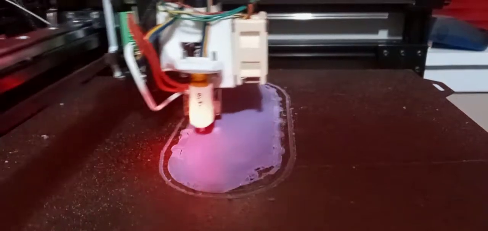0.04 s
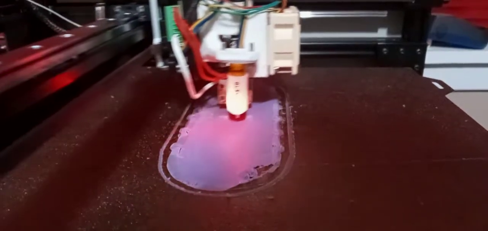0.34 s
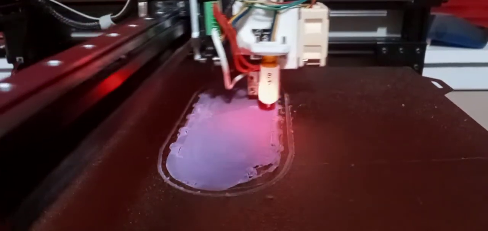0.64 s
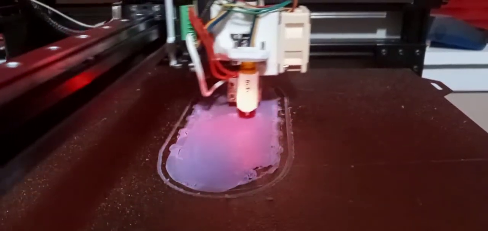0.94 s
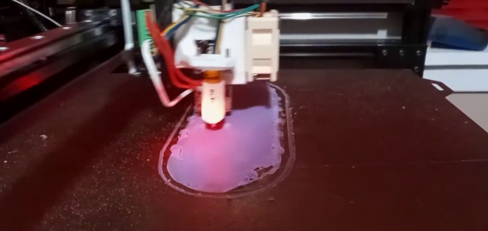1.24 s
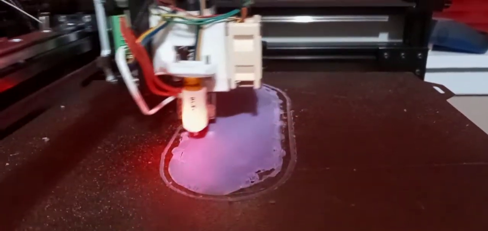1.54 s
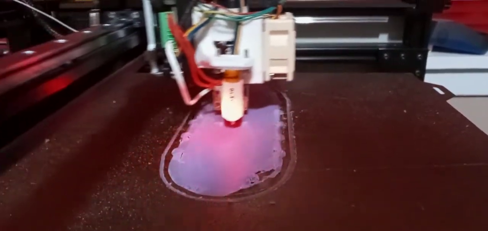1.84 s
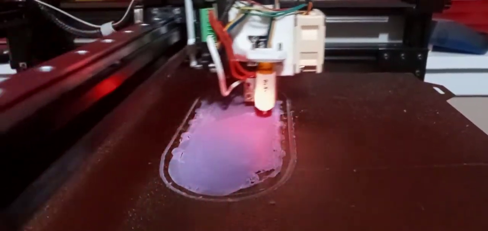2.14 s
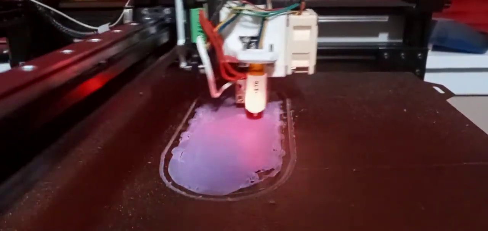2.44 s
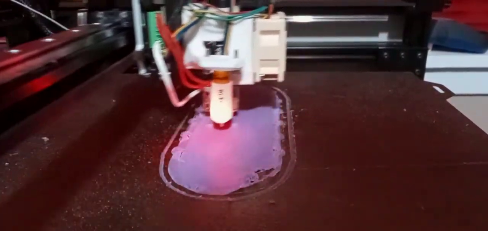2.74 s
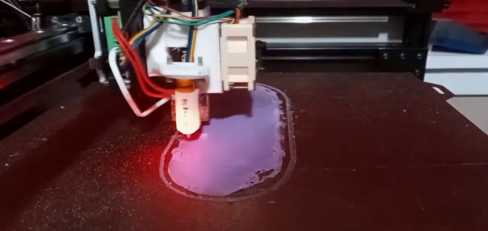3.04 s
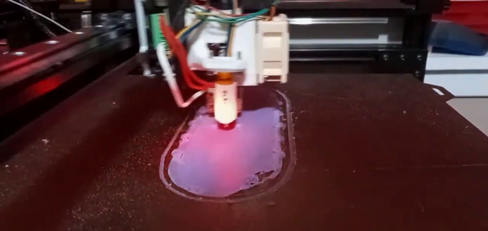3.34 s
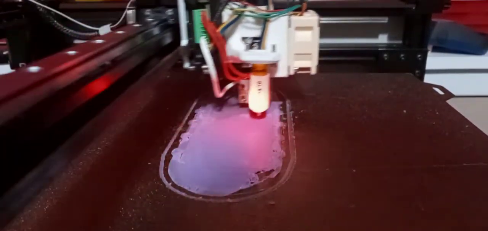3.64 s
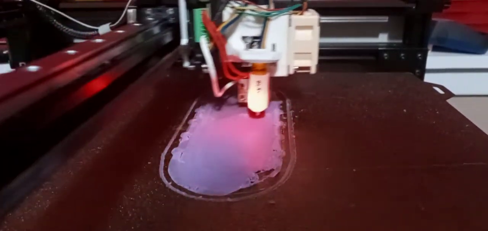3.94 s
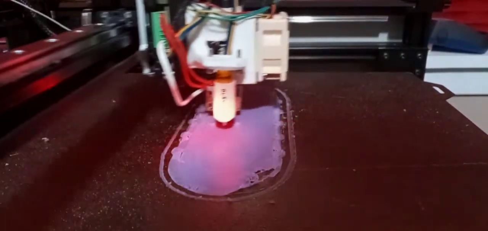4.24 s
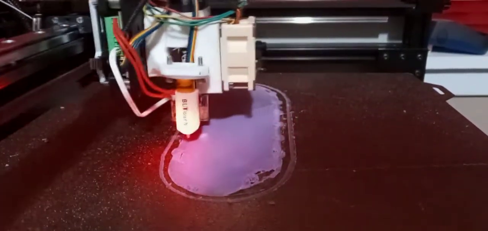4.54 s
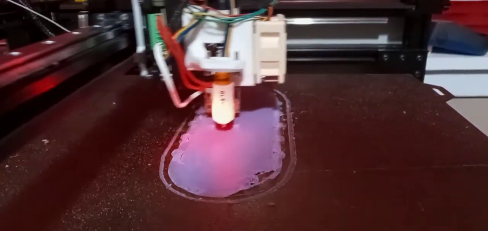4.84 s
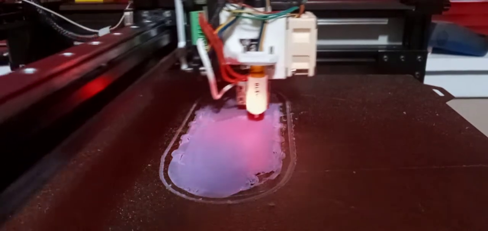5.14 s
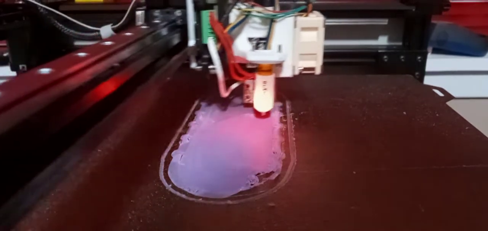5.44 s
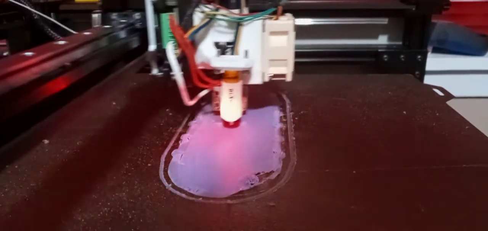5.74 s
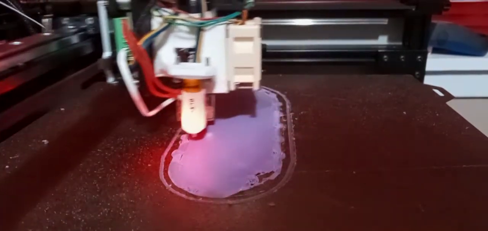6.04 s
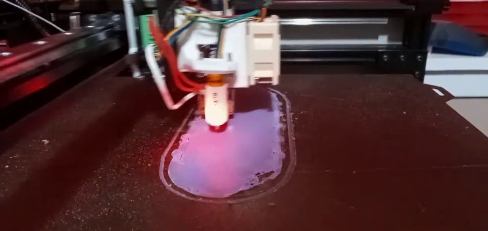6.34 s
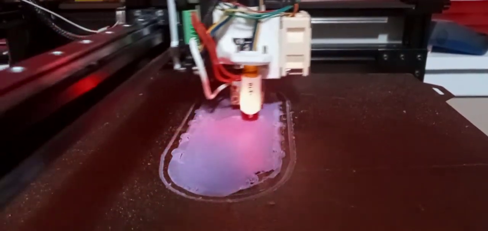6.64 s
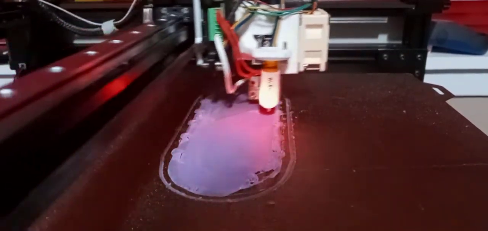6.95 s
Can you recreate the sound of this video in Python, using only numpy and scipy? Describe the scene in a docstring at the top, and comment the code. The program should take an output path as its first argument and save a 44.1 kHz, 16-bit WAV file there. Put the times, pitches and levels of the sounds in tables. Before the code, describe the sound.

A 3D printer's motors hum and whine as its head shuttles back and forth, knocking at every turn over rushing fans.

```python
"""Stepper motors hum and whine as the head of a nearby 3D printer shuttles to and fro, filling a layer.
Every motor step tugs the frame, and the fast, even tugs make the tones. At each turn the motors brake
and start again; both jolts boom in the frame and rattle the carriage that carries the head.
The motor coils sizzle and a thin whistle comes and goes. Behind them the rails hiss,
small ticks sound as the head travels, and cooling fans rush."""
import sys
import numpy as np
from scipy import signal
from scipy.fft import rfft, irfft, next_fast_len
from scipy.io import wavfile
from scipy.ndimage import uniform_filter1d, map_coordinates

SR = 44100
rng = np.random.default_rng(int(sys.argv[2]) if len(sys.argv) > 2 else 0)


def wrap_up_sound(samples):
    """Save the sound to the file named by the first command line argument, as 16-bit audio."""
    columns = np.atleast_2d(samples).T
    # keep every value between -1 and 1, then stretch to whole-number steps
    tamed = np.clip(columns, -1, 1)
    steps = np.round(tamed * 32767).astype(np.int16)
    wavfile.write(sys.argv[1], SR, steps)


N = 312795

STEP_HZ = 346.5  # motor steps per second at full speed
HUM, WHINE, HIGH_WHINE = 1, 6, 12  # multiples of the step rate
# The motor tones on a stroke (one trip of the head) to the right. Each row: multiple of the step rate,
# level in dB, rise over the stroke in dB, dip at mid-stroke in dB, depth of the beat (a slow pulsing)
# from 0 to 1, first peak of the beat as a share of the stroke.
RIGHTWARD_TONES = [(1, -42, 5.5, -1.2, .05, 0.22), (2, -52.5, 2.5, 4.5, 0.23, 0.049),
                   (3, -55.5, -2, 0.5, 0.1, 0.15), (4, -52, 0.3, 0.5, 0.42, .32),
                   (5, -65.5, 8.5, 0, .3, 0.25), (6, -44.5, 2, 0.5, 0.36, 0.32), (7, -68, 4, -5, 0.9, 0.18),
                   (8, -75, 2, 2.5, 1, .14), (10, -73, -14.5, 0, .35, 0.083),
                   (11, -80, -13, -1.5, 0.5, .08), (12, -62, 1.5, 4, 0.07, 0.16),
                   (16, -68.5, -0.5, -1, 0.05, 0.07), (18, -76.5, -3, 0, 0.1, 0.12)]
# The motor tones on a stroke to the left, with the same columns.
LEFTWARD_TONES = [(1, -40.5, -2, -1, .06, 0.25), (2, -55, -2, -1, 0.14, .3), (3, -61, -3, -0.5, 0.31, .05),
                  (4, -51.5, -1.5, 0, 0.18, 0.31), (5, -62, -8.5, -2, .3, .3),
                  (6, -40.5, .5, 0.5, 0.23, .21), (7, -71.5, -12, -0.5, 1, 0.33),
                  (8, -70, -1.5, 2.5, 0.95, 0.23), (10, -77, 16, 3.5, 0.65, 0.042),
                  (11, -74.5, 12, -1, 0.2, 0.25), (12, -63, -5, 7, 0.15, 0.34),
                  (16, -73, 3.5, 0.5, 0.22, 0.11), (18, -79, 6, -1.5, 0.1, 0.17)]


def steppers(step_phase, progress, leftward):
    """Every step tugs the frame; the hum and its overtones swell alike on all strokes of one direction."""
    tones = np.zeros(N)
    places = np.linspace(0, 1, 100)
    for right_row, left_row in zip(RIGHTWARD_TONES, LEFTWARD_TONES):
        multiple = round(right_row[0])
        left_level = np.interp(progress, places, stroke_level(left_row, places))
        right_level = np.interp(progress, places, stroke_level(right_row, places))
        level = np.where(leftward, left_level, right_level)
        if multiple == HIGH_WHINE:
            level = level * amp(drift_db())
        unsteady = .25 if multiple in (HUM, WHINE) else 1  # these two waver less than the rest
        flutter_db = unsteady * (1.2 * wobble(6) + wobble(35))
        tones += level * amp(flutter_db) * tone(multiple * step_phase + unsteady * .28 * wobble(30))
    return tones


def stroke_level(row, progress, beats_per_stroke=2.71):
    """One tone's strength along a stroke: a slope, a dip or hump midway, and a beat as the rotors turn."""
    _, db, rise_db, dip_db, depth, peak = row
    beat = np.abs(1 + depth * np.exp(2j * np.pi * beats_per_stroke * (progress - peak)))
    return amp(db + rise_db * (progress - .5) + dip_db * dip(progress)) * beat


# The turns of the head, left end first, then right and left in turn. Each row: braking time and starting
# time in seconds, braking boom and starting boom in dB, braking rattle and starting rattle in dB.
HEAD_TURNS = [(-.005, .025, -24.5, -25.5, -56.5, -48.5), (0.76, 0.804, -23.5, -22, -54.5, -53.5),
              (1.537, 1.578, -27.5, -24.5, -49, -48), (2.316, 2.354, -32, -21, -72, -48.5),
              (3.097, 3.138, -24, -25.5, -44.5, -49), (3.877, 3.917, -23.5, -22.5, -52, -55.5),
              (4.658, 4.694, -31.5, -22, -55, -44), (5.409, 5.449, -29, -21.5, -65, -47),
              (6.189, 6.226, -27, -29.5, -43.5, -50), (6.967, 7.008, -24.5, -31, -52, -66.5)]
# The frame's low notes. Each row: pitch in Hz, dB added to the boom, seconds to swell, seconds to
# fade by 60 dB.
FRAME_NOTES = [(240, -9.5, 0.010, 0.08), (258.6, -14, 0.025, 0.15)]
# The colour of the rattle (how strong its lows and highs are). Each row: frequency in Hz, relative dB.
RATTLE_COLOUR = [(100, -39), (2500, -10), (4400, -12), (6000, -16), (8400, -17), (9100, -16), (9800, -38),
                 (10700, -13.5), (11450, 6.5), (12200, -10.5), (13400, -2), (15700, -8)]


def jolts():
    """Each jolt makes the frame boom; loose carriage parts buzz at the pace of its lowest note."""
    boom, buzz = np.zeros(N), np.zeros(N)
    turns = np.array(HEAD_TURNS)
    braking, starting = turns[:, 0::2], turns[:, 1::2]
    for start, boom_db, rattle_db in np.vstack([braking, starting]):
        span = slice(max(0, int(start * SR)), int(start * SR) + SR // 3)
        t = np.maximum(clock()[span] - start, 0)
        for hz, db, rise_s, fade_s in FRAME_NOTES:
            swell = np.sin(np.pi / 2 * np.minimum(t / rise_s, 1)) ** 2
            # the motor lets go gradually, so the fade begins gently
            fading_for_s = np.hypot(np.maximum(t - rise_s, 0), .016) - .016
            fade = amp(-60 * fading_for_s / fade_s)
            detuned_hz = hz * (1 + .016 * rng.normal())
            swing = np.sqrt(2) * np.sin(2 * np.pi * detuned_hz * t)
            boom[span] += amp(boom_db + db) * swell * fade * swing
        contact = np.minimum(t / .0033, 1) * amp(-60 * np.maximum(t - .02, 0) / .072)
        chatter = 1 + .45 * np.cos(2 * np.pi * FRAME_NOTES[0][0] * t)
        buzz[span] += amp(rattle_db) * contact * chatter
    return boom + buzz * patchy(noise(RATTLE_COLOUR), depth_db=1.2)


# The notes of two panels. Each row: delay after braking in seconds, pitch in Hz, level at the left end
# in dB, level at the right end in dB.
PANEL_NOTES = [(.018, 826.5, -48, -42.5), (0.045, 541, -54, -47)]


def panels():
    """Two panels ring briefly in each turn, set off by the changing step rate."""
    rings = np.zeros(N)
    for delay, hz, left_db, right_db in PANEL_NOTES:
        level = sum(amp(right_db if i % 2 else left_db) * bump(turn[0] + delay, width_s=.011)
                    for i, turn in enumerate(HEAD_TURNS))
        rings += level * tone(2 * np.pi * hz * clock() + .5 * wobble(60))
    return rings


# The colour of the coils' sizzle. Each row: frequency in Hz, relative level in dB.
SIZZLE_COLOUR = [(2700, -26), (4400, -15), (5200, -29), (7100, -21), (7900, -38), (11500, -40),
                 (12400, -21), (14200, -16), (14550, 0), (14800, -1), (15100, -11), (15700, -17)]


def sizzle(step_phase):
    """The coil current kicks once every two steps, making a row of evenly spaced high tones."""
    tones = np.zeros(N)
    for multiple in range(15, 91):
        level_db = along(SIZZLE_COLOUR, multiple * STEP_HZ / 2) + 2.5 * wobble(22)
        tones += amp(level_db) * np.cos(multiple * step_phase / 2 + 1.4 * rng.normal())
    return unit(tones)


# The colour of the coils' hiss. Each row: frequency in Hz, relative level in dB.
HISS_COLOUR = [(9800, -32), (11500, -14), (12200, -4), (14100, -3), (14700, 8), (15200, 0), (15700, -1)]


def coils(step_phase, running, leftward_progress):
    """The coils sizzle and give off a pulsing hiss; both die down as the head runs to the left."""
    hiss = unit(noise(HISS_COLOUR) * (1 + .35 * np.cos(step_phase / 2)))
    sizzle_db = -58 + 2 * wobble(25) - 4.5 * leftward_progress
    sizzling = amp(sizzle_db) * sizzle(step_phase)
    thin_tone = amp(-76.5 + 1.5 * wobble(12)) * tone(37 * step_phase)  # stands out of the sizzle
    hiss_db = -64.5 - 12 * leftward_progress + 2 * wobble(20)
    return running * (sizzling + thin_tone) + amp(hiss_db) * hiss


# The thin whistles. Each row: start in seconds, end in seconds, level in dB.
WHISTLE_SPELLS = [(.095, .458, -57), (1.658, 2.016, -61.5), (2.408, 2.628, -62), (3.2, 3.574, -60.5),
                  (6.283, 6.66, -62.5), (7.066, 7.2, -58)]


def whistle(hz=11963):
    """The circuit that drives a motor sings at one high pitch during some strokes."""
    level = sum(amp(db) * gate(start, end, edge_s=.012) for start, end, db in WHISTLE_SPELLS)
    return level * amp(.8 * wobble(4.5)) * tone(2 * np.pi * hz * clock())


ROUGH_SPOT, ROUGH_SPOT_DB = .768, -43.5  # share of the way along each stroke to the right, and level
WHINE_BRAKING_DB, WHINE_STARTING_DB = -45, -44  # the rasp of the motor whine at the left end
# The colour of the rolling on the rails. Each row: frequency in Hz, relative level in dB.
RAIL_COLOUR = [(2000, -14), (3000, -2.5), (3600, -1.5), (4250, 9), (4800, 2.5), (5050, -14.5), (5450, 1.5),
               (6650, -21.5), (7200, 3), (7600, -35.5), (9200, -18), (9800, -43), (12000, -21.5)]


def rails_and_rasps(progress, leftward):
    """The rails hiss and rasp at one rough spot; at the left end the motor whine turns to a brief rasp."""
    rolling_db = -65.5 + 3.5 * dip(progress) - 2 * progress * leftward + drift_db()
    grit_db = .83 * wobble(4.1) + 2.3 * wobble(120)
    rolling = amp(rolling_db + grit_db) * patchy(noise(RAIL_COLOUR), depth_db=1.5)
    ends = stroke_ends()
    rasps = [(left + ROUGH_SPOT * (right - left), ROUGH_SPOT_DB)
             for left, right in zip(ends[0::2], ends[1::2])]
    for braking, starting, *_ in HEAD_TURNS[0::2]:
        rasps += [(braking, WHINE_BRAKING_DB), (starting, WHINE_STARTING_DB)]
    rasp = noise([(1100, -25.5), (1550, -4.0), (1950, 1.5), (2500, -22.0), (3500, -44.5)])
    return rolling + rasp * sum(amp(db) * bump(when, width_s=.021) for when, db in rasps)


# The clear ticks. Each row: start in seconds, level in dB.
CLEAR_TICKS = [(.616, -55), (2.166, -56), (2.254, -56.5), (3.648, -61), (3.809, -57), (5.108, -54.5),
               (5.27, -55), (6.893, -54)]
# The colour of a tick. Each row: frequency in Hz, relative level in dB.
TICK_NOISE_COLOUR = [(2000, -32.5), (4200, -3), (5500, 0), (7000, 6), (7900, -13.5), (9000, -16),
                     (9900, -23), (11400, -14), (15000, -26.5)]


def ticks(faint_count=170, fade_s=.026):
    """Small ticks as the head travels: a few clear ones, some at the rough spot, among many faint ones."""
    faint_ticks = rng.uniform([0, -76], [N / SR, -64.5], (faint_count, 2))  # random times and levels
    kicks = np.zeros(N)
    for start, db in np.vstack([CLEAR_TICKS, faint_ticks]):
        kicks[min(int(start * SR), N - 1)] += amp(db)
    fade = amp(-60 * np.arange(SR // 20) / SR / fade_s)
    return signal.fftconvolve(kicks, fade)[:N] * noise(TICK_NOISE_COLOUR)


# The colour of the air from the fans. Each row: frequency in Hz, relative level in dB.
AIR_COLOUR = [(30, -46), (90, -37.5), (130, -18), (170, -10), (255, 1.5), (310, 0.5), (430, -1.5),
              (500, -10), (630, -2.5), (780, -2), (950, 4.5), (1130, -6), (1480, -4), (1640, 4),
              (2050, -3.5), (2500, -11.5), (3000, -25.5), (5000, -49)]
# The tones of the fan blades. Each row: pitch in Hz, level in dB.
BLADE_TONES = [(139, -80), (255, -73), (978, -64.5)]


def fans():
    """The fans push rushing air, and their blades add a few unsteady tones."""
    swirl_db = .4 * wobble(5) + .8 * wobble(30)
    air = amp(-45.5 + swirl_db) * patchy(noise(AIR_COLOUR), depth_db=2.5)
    blades = sum(amp(db + wobble(10)) * tone(2 * np.pi * hz * clock() + 1.1 * wobble(8.3))
                 for hz, db in BLADE_TONES)
    return air + blades


def head_motion(brake_lead_s=.011, speed_up_s=.015):
    """How deep the head is in a turn (0-1), how far along its stroke (0-1), and whether it runs left."""
    turning = sum(gate(braking - brake_lead_s, starting + speed_up_s, edge_s=.026)
                  for braking, starting, *_ in HEAD_TURNS)
    ends = stroke_ends()
    ends = np.append(ends, ends[-1] + np.diff(ends).mean())  # the last stroke is of average length
    stroke, progress = np.divmod(np.interp(clock(), ends, np.arange(len(ends))), 1)
    return np.minimum(turning, 1), progress, stroke % 2


def stroke_ends():
    """The moments at which the head stands still, halfway between braking and starting."""
    return np.array(HEAD_TURNS)[:, :2].mean(axis=1)


def drift_db(db_per_s=-.35):
    """The high whine and the rails slowly grow quieter as the layer fills."""
    return db_per_s * (clock() - clock().mean())


def dip(progress):
    """-1/2 at mid-stroke, +1/2 at both ends."""
    return .5 * np.cos(2 * np.pi * progress)


def amp(db):
    """Turn decibels into a number to multiply by."""
    return 10 ** (np.asarray(db) / 20)


def unit(x):
    """Scale x to an average strength (rms) of 1."""
    return x / np.sqrt(np.mean(x ** 2) + 1e-20)


def clock():
    """The time of every sample in seconds."""
    return np.arange(N) / SR


def along(colour, hz):
    """Read a colour's level in dB at any frequency, sliding between its rows."""
    row_hz, row_db = np.transpose(colour)
    return np.interp(np.log(hz + 1), np.log(row_hz), row_db)


def wobble(rate):
    """A smooth curve through `rate` random values a second."""
    coarse = np.arange(0, N + 64, 64)
    values = rng.standard_normal(2048)
    return np.interp(np.arange(N), coarse, map_coordinates(values, [coarse * rate / SR], mode="wrap"))


def filtered(x, gain_at):
    """Multiply each frequency in x by gain_at(hz)."""
    size = next_fast_len(N + SR // 2)
    return irfft(rfft(x, size) * gain_at(np.fft.rfftfreq(size, 1 / SR)), size)[:N]


def noise(colour):
    """Noise of the given colour and strength 1."""
    return unit(filtered(rng.standard_normal(N), lambda hz: amp(along(colour, hz))))


def patchy(x, depth_db):
    """Make x louder and softer in random patches of time and pitch; the result has strength 1."""
    spectra = signal.stft(x, nperseg=512)[2]
    patches = uniform_filter1d(rng.standard_normal(spectra.shape), size=6, axis=0)
    patches = uniform_filter1d(patches, size=9, axis=1)
    return unit(signal.istft(spectra * amp(depth_db * unit(patches)), nperseg=512)[1][:N])


def tone(phase):
    """A pure tone of strength 1 that starts anywhere in its cycle."""
    return np.sqrt(2) * np.sin(phase + rng.uniform(0, 2 * np.pi))


def gate(start, end, edge_s):
    """Fade in from `start`, hold at 1, and fade out by `end`."""
    t = clock()
    return np.clip(np.minimum(t - start, end - t) / edge_s, 0, 1)


def bump(peak_s, width_s):
    """One smooth swell up to 1 and back."""
    return np.exp(-np.minimum(((clock() - peak_s) / width_s) ** 2, 50))


def scene():
    """The motors, coils and rails follow the moving head; all sources add up in one channel."""
    turning, progress, leftward = head_motion()
    step_hz = STEP_HZ * (1 - .2 * turning ** 4)  # the steps slow down in each turn
    step_phase = 2 * np.pi * np.cumsum(step_hz) / SR
    running = 1 - turning  # and the motor tones die away there
    motors = running * steppers(step_phase, progress, leftward)
    motors += coils(step_phase, running, progress * leftward)
    foreground = motors + whistle() + jolts() + panels()
    background = fans() + rails_and_rasps(progress, leftward) + ticks()
    return (foreground + background)[None]


def record(dry, bass_hz=75, top_hz=15780):
    """The small microphone loses the deep bass, and the very highest treble is cut off."""
    thin = signal.sosfilt(signal.butter(2, bass_hz, "highpass", fs=SR, output="sos"), dry[0])
    return filtered(thin, lambda hz: hz < top_hz)[None]


dry = scene()
out = record(dry)
wrap_up_sound(out)
```